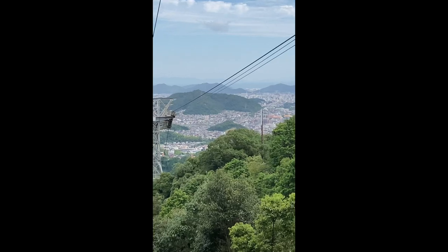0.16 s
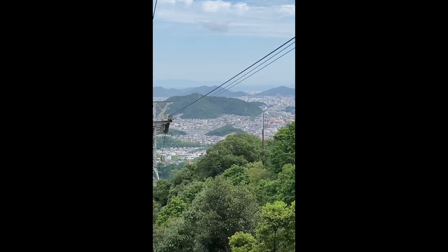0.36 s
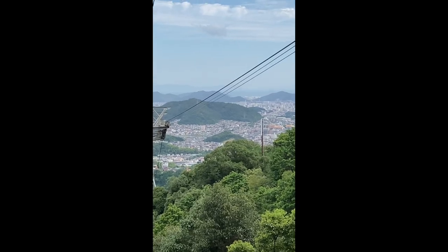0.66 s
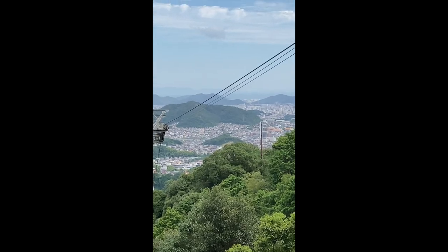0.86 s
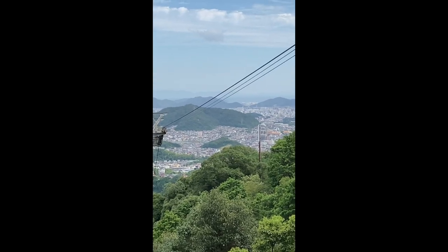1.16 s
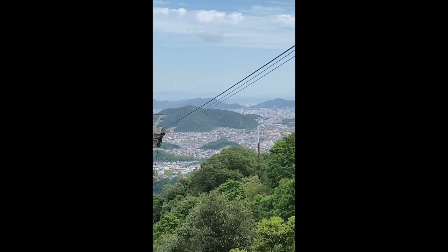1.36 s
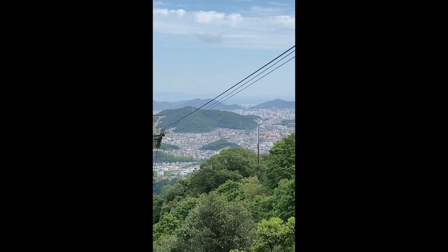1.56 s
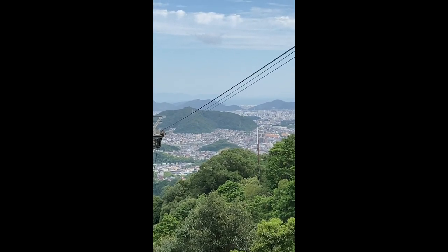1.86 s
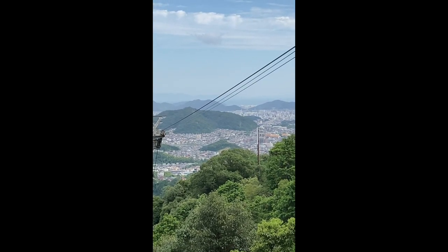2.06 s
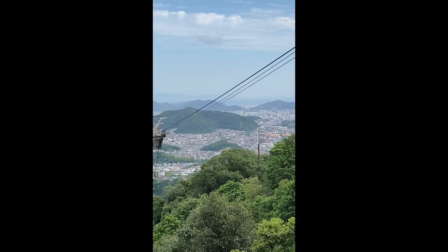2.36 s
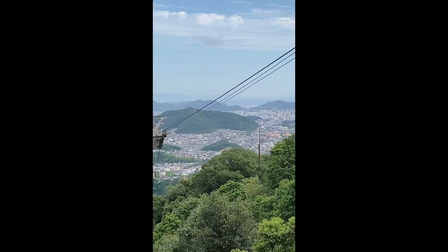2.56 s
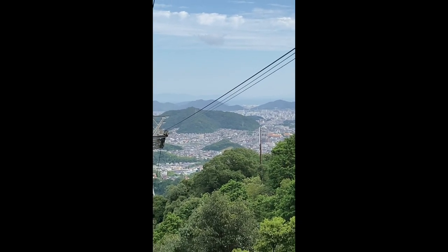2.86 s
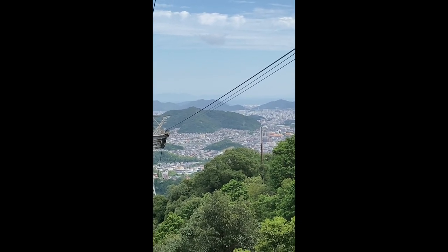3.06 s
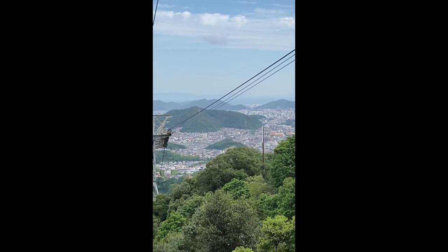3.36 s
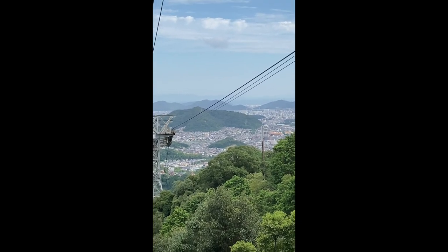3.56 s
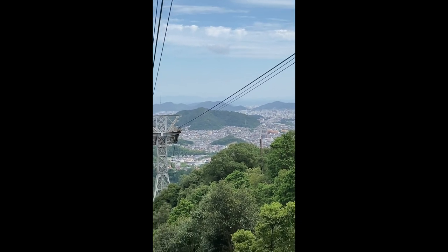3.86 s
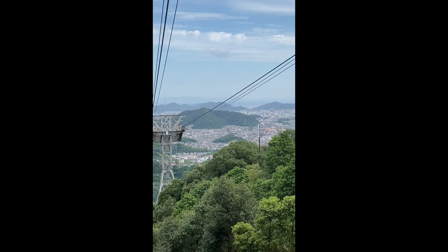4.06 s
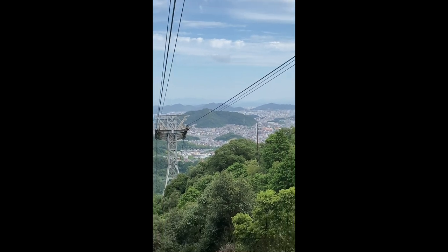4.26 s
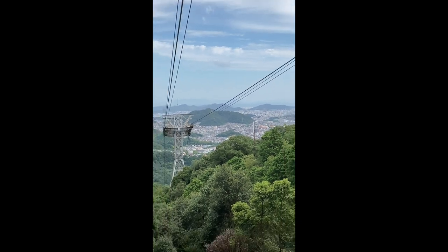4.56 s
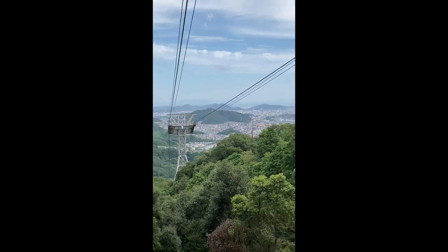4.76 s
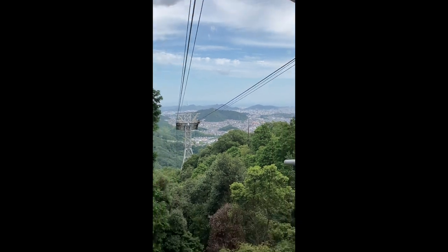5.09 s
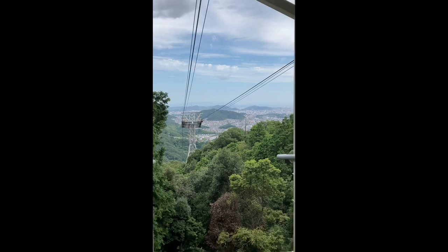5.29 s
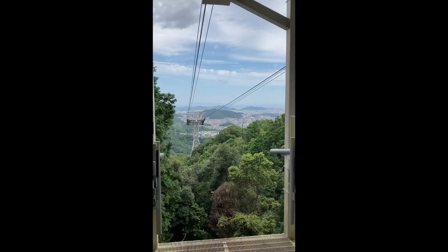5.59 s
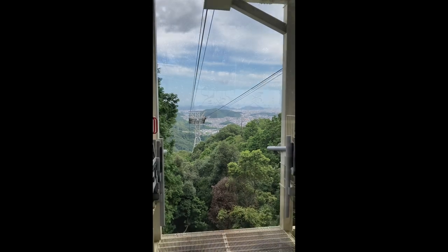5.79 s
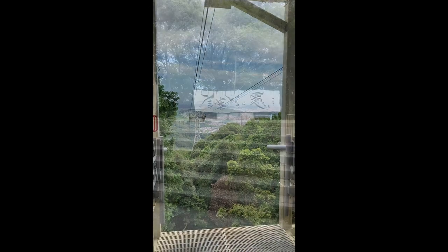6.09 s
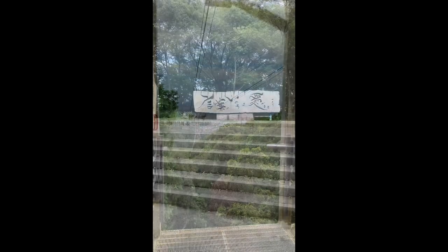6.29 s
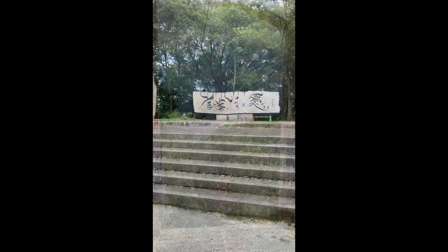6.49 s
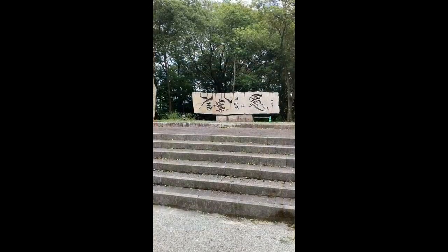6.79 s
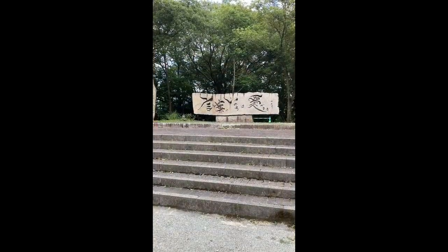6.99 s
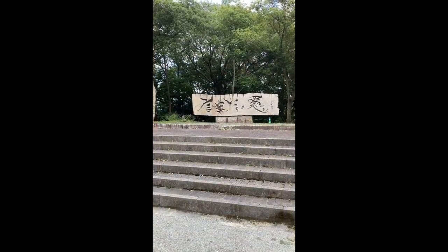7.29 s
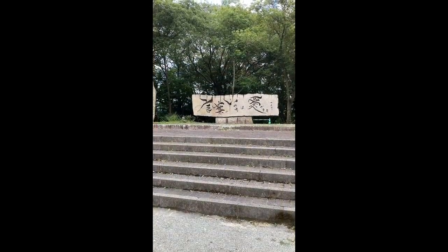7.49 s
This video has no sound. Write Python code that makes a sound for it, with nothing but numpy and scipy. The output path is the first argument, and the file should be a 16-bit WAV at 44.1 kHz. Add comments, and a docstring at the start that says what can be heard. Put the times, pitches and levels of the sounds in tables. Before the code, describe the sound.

On a wooded hillside, a chorus of cicadas hisses and swells over the steady low rumble and gear whine of a cable car station. One nearer cicada starts a buzz that grows louder. Near the end the sound cross-fades to a spot among trees, where the machinery is gone and the cicadas throb and rattle over a faint valley murmur. The insects spread wide in stereo.

```python
"""Cicadas hiss, swell and buzz on a wooded hillside over the rumble and gear whine of a ropeway station.
Distant singers blend into a chorus; nearer ones sing in narrow bands, rattle in bursts or buzz with two tymbals
clicking in turn. Near the end the sound cross-fades to a quieter spot among trees, where the cicadas throb over
a valley murmur and the machinery is gone. Left and right are alike in the bass; in the treble their likeness
and phase difference change from band to band."""
import sys
import numpy as np
from scipy import signal
from scipy.fft import rfft, irfft, next_fast_len
from scipy.io import wavfile
from scipy.ndimage import uniform_filter1d

SR = 44100
rng = np.random.default_rng(int(sys.argv[2]) if len(sys.argv) > 2 else 0)


def put_to_file(sound):
    """Save the sound as 16-bit audio at rate SR, in the file named by the first command-line argument."""
    columns = np.atleast_2d(sound).T  # one column per channel
    safe = np.clip(columns, -1, 1)
    whole_steps = np.round(safe * 32767)
    wavfile.write(sys.argv[1], SR, whole_steps.astype(np.int16))


N = 336909
T = np.arange(N) / SR
N_FFT = next_fast_len(N, True)
BIN_HZ = np.fft.rfftfreq(N_FFT, 1 / SR)
FADE_S = (5.815, 6.74)
TREES = np.interp(T, FADE_S, [0, 1])  # cross-fade gains
STATION = 1 - TREES


def amp(db):
    return 10 ** (np.asarray(db) / 20)


def unit_rms(x):
    return x / np.sqrt(np.mean(x ** 2) + 1e-20)


def over_time(rows):
    times_s, *columns = np.transpose(rows)
    return [np.interp(T, times_s, c) for c in columns]


def over_bins(rows):
    freq_hz, *columns = np.transpose(rows)
    return [np.interp(np.log(BIN_HZ + 1), np.log(freq_hz + 1), c) for c in columns]


def noise():
    """Two unrelated noises: what left and right share and what they do not."""
    return rng.standard_normal((2, N))


def shaped_noise(spectrum):
    """Noise pair with a tabulated spectrum, silent outside it; rms 1."""
    inside = (BIN_HZ > spectrum[0][0]) & (BIN_HZ < spectrum[-1][0])
    gain = amp(over_bins(spectrum)[0]) * inside
    return unit_rms(irfft(rfft(noise(), N_FFT) * gain, N_FFT)[:, :N])


def band(x, centre_hz, width_hz):
    """Steep resonance with a movable centre; rms 1."""
    carrier = np.exp(2j * np.pi * np.cumsum(centre_hz * np.ones(N)) / SR)
    lowpass = signal.butter(3, 0.57 * width_hz, fs=SR, output="sos")
    return unit_rms((carrier * signal.sosfilt(lowpass, x / carrier)).real)


def drift(top_hz):
    """Random wander in the decade below top_hz; rms 1."""
    hz = np.geomspace(top_hz / 10, top_hz, 16)[:, None]
    wander = np.sin(2 * np.pi * (hz * T[::256] + rng.random(hz.shape))).sum(0)
    return np.interp(T, T[::256], unit_rms(wander))


def patchy(x, size, bins, frames, depth_db):
    """Random swells over frequency and time; rms 1."""
    spectra = signal.stft(x, SR, nperseg=size)[2]
    patches = uniform_filter1d(rng.standard_normal(spectra.shape[1:]), bins, 0)
    patches = unit_rms(uniform_filter1d(patches, frames, 1))
    gain = amp(depth_db * np.clip(patches, -3, 1.8))
    return unit_rms(signal.istft(spectra * gain, SR, nperseg=size)[1][:, :N])


def whistle(hz, jitter):
    """A pair of ringing tones, each trembling in pitch and level."""
    cycles = np.array([np.cumsum(hz * (1 + jitter * drift(60.5))) / SR for _ in range(2)])
    return np.sqrt(2) * amp([2.2 * drift(25.5) for _ in range(2)]) * np.sin(2 * np.pi * cycles)


def tones(rows):
    """Wavering sines, each with its own left-right level and phase difference."""
    out = np.zeros((2, N))
    for hz, db, waver_hz, pan_db, lead_rad in rows:
        phase = 2 * np.pi * (hz * T + rng.random()) + 0.48 * drift(waver_hz)
        level = np.sqrt(2) * amp(db + 1.07 * drift(waver_hz))
        out += level * amp([[pan_db / 2], [-pan_db / 2]]) * np.sin([phase + lead_rad, phase])
    return out


def fade_gain(station_db, trees_db):
    """Unrelated sounds at the two spots add in power, so the fade dips."""
    return np.hypot(STATION * amp(station_db), TREES * amp(trees_db))


def stereo_image(pair):
    """Left-right likeness and phase difference, set band by band over frequency."""
    # left against right: freq_hz, likeness, left_lead_rad
    image = [(30, 0.99, .01), (200, .99, .03), (434, 0.88, 0.13), (720, 0.49, 0.13), (1290, 0.7, 0.33),
             (2080, 0.05, 1.8), (3900, 0.14, 3.46), (4350, 0.1, 1.37), (4910, 0.62, 2.83),
             (5480, 0.92, 3.14), (7340, 0.78, 5.01), (7670, 0.99, 6.28), (9760, 1, 6.29), (10140, 0, 7.6),
             (11100, 1.001, 9.42), (12500, 1.001, 9.43), (13220, 0.2, 12.4), (14400, 1.001, 11.9),
             (16500, 1.001, 14)]
    likeness, lead_rad = over_bins(image)
    likeness = np.clip(likeness, 0, 1)
    left, unrelated = rfft(pair, N_FFT)
    right = likeness * np.exp(-1j * lead_rad) * left + np.sqrt(1 - likeness ** 2) * unrelated
    return irfft([left, right], N_FFT)[:, :N]


def valley_murmur():
    """Low noise from far down the valley."""
    # murmur spectrum: freq_hz, relative_db
    spectrum = [(22, -24), (38, -10), (50, -3.5), (78, -11), (125, -7), (190, -11), (250, -17.5),
                (400, -16.5), (700, -23.5), (1050, -20.5), (1500, -22), (2000, -17), (3600, -54)]
    return amp(-52.5 + .7 * drift(4.9)) * shaped_noise(spectrum)


def faint_hums():
    """Three low hums and a thin tone among the trees."""
    # tones: pitch_hz, level_db, waver_hz, left_over_right_db, left_lead_rad
    partials = [(48.4, -54, 3, .3, .02), (74.2, -54, 3, .3, .02), (123, -62, 4, .3, .05),
                (2422, -65, 60, .2, 1.5)]
    return tones(partials)


def pop():
    """One soft falling pop, opposite in left and right."""
    start_s, halving_s, decay_s = 3.6608, .00065, .012
    age_s = np.maximum(T - start_s, 0)
    hz = 20 + 2000 / (1 + age_s / halving_s)
    push = amp(-31.5) * np.exp(-age_s / decay_s) * np.sin(2 * np.pi * np.cumsum(hz * (age_s > 0)) / SR)
    return np.array([push, -push])


def station_rumble():
    """Low, slightly unsteady machinery noise."""
    # rumble spectrum: freq_hz, relative_db
    spectrum = [(22, -32), (38, -18), (57, 2), (70, -5.5), (100, -1), (130, -1), (150, -1.5), (220, -4.5),
                (250, -9), (330, -8), (400, -8.5), (460, -10.5), (600, -13), (1000, -13.5), (1400, -17),
                (2000, -16), (3000, -41.5), (3600, -62)]
    return amp(-46 + 1.21 * drift(9.5)) * shaped_noise(spectrum)


def gear_whine():
    """The ropeway machinery hums and its gears whine."""
    # machine tones: pitch_hz, level_db, waver_hz, left_over_right_db, left_lead_rad
    partials = [(57.5, -52.5, 6, .6, .02), (119.6, -50, 9, .4, .01), (269.2, -63.5, 4, -2.3, .2),
                (386.6, -62, 5, 1.7, .1), (479.4, -58.2, 2.2, .45, -.2), (538.5, -52, 1.3, .9, .7),
                (807.8, -61.5, 1.5, .1, -.3), (1077, -62, 1.5, 11, -2.1), (1346.3, -66, 1.5, 9.4, -.45),
                (1437, -72, 1.5, -4.2, -.35), (1615.6, -73, 1.5, 4.5, -.2), (232, -66, 6, .3, .05),
                (418, -67, 14, .3, .1), (3770, -72, 3, .1, 3.1)]
    return tones(partials)


def far_chorus():
    """Distant cicadas blend to a patchy hiss; thin lines of single singers come and go."""
    # chorus spectrum: freq_hz, relative_db
    spectrum = [(2400, -19.5), (2800, -17), (3550, -29), (4150, -3), (4750, -4.5), (5500, 2.5),
                (6400, -0.9), (7000, -6), (8700, -4.5), (9900, -14.5), (10700, -10), (12500, -10.5),
                (14000, -11), (16500, -12)]
    hiss = patchy(shaped_noise(spectrum), size=512, bins=12, frames=10, depth_db=.5)
    return fade_gain(-34, -34) * patchy(hiss, size=2048, bins=1, frames=5, depth_db=7.5)


def thin_singers():
    """Cicadas heard only as thin overtones, one clear tone and one shrill band."""
    # overtone pitches: time_s, low_hz, middle_hz, high_hz
    pitches = [(4.5, 5770, 8030, 8940), (5.9, 5790, 8110, 9010)]
    # overtone envelope: time_s, level_db
    envelope = [(4.45, -66), (4.7, -67), (5.75, -47), (5.95, -70)]
    # clear tone: time_s, pitch_hz, level_db
    clear_song = [(0, 4360, -56), (.7, 4370, -58), (1.1, 4380, -50), (2.2, 4310, -53), (2.6, 4320, -66),
                  (3.8, 4590, -66), (4.1, 4600, -53), (4.7, 4590, -53), (5.5, 4630, -56), (6.0, 4630, -66)]
    overtones = amp(over_time(envelope)[0]) * sum(whistle(hz, jitter=.001) for hz in over_time(pitches))
    shrill = amp(-48) * np.interp(T, [2.5, 5.5], [1, 0]) * band(noise(), 8238, width_hz=220)
    clear_hz, clear_db = over_time(clear_song)
    return overtones + amp(clear_db) * whistle(clear_hz, jitter=.0029) + shrill


def sizzle():
    """A wide band of unresolved clicking grows and drops back."""
    db = np.interp(T, [.67, 4.06, 4.39], [-47.5, -39.5, -47.5])
    return fade_gain(db, trees_db=-49) * amp(0.46 * drift(10.0)) * band(noise(), 6980, width_hz=880)


def rattling_cicada():
    """High noisy clicks come in bursts, deepest around crest_s."""
    # rattle envelope: time_s, level_db
    envelope = [(0, -58), (2.5, -50), (6.2, -50), (6.7, -46), (6.95, -44), (7.2, -48), (7.64, -47)]
    # body response: freq_hz, relative_db
    body = [(4500, -28), (5500, -14), (7000, -22), (12500, -42), (14300, -3), (15500, -5), (16500, -15)]
    crest_s, burst_hz, click_hz = 7.034, 17.2, 205
    depth_db = 2.5 + 3.8 * np.exp(-((T - crest_s) / .15) ** 2)
    burst_db = depth_db * np.cos(2 * np.pi * (T - crest_s) * burst_hz + .4 * drift(3.5))
    level = amp(over_time(envelope)[0] + burst_db + 0.98 * drift(3.5))
    clicks = 0.38 + np.exp(-(T * click_hz % 1) / .3)
    return level * unit_rms(clicks * shaped_noise(body))


def buzzing_cicada():
    """Two tymbals click in turn, so every second harmonic is stronger; leaves scramble the phases."""
    # buzz: time_s, level_db, body_resonance_hz
    song = [(0, -63, 5100), (2.05, -49, 5250), (2.3, -49, 5100), (2.9, -51, 5150), (3.4, -52, 5390),
            (4.0, -43.5, 5730), (4.4, -45.5, 6040), (4.85, -42, 5700), (5.3, -44, 5900), (6.2, -46, 5950)]
    # tymbal cycle: time_s, rate_hz
    tymbal_rate = [(2.1, 226.2), (4.0, 227.4), (4.6, 227.4), (6.2, 228.6)]
    # two upper resonances, treble, low hiss: centre_hz, width_hz
    side_bands = [(8210, 300), (9120, 300), (13200, 2500), (2720, 450)]
    # those bands against the body: early_db, late_db
    side_levels = [(-4, -4), (-25, -4), (-3, -8), (-30, -22.5)]
    db, body_hz = over_time(song)
    cycles = np.cumsum(over_time(tymbal_rate)[0] * (1 + .0014 * drift(40.5))) / SR
    harmonics, grid = np.arange(18, 66), np.linspace(0, 1, 4097)
    phases = harmonics * grid[:, None] + rng.random((2, 1, len(harmonics)))
    waveforms = np.cos(2 * np.pi * phases) @ (1.7 - harmonics % 2)
    clicks = np.array([np.interp(cycles % 1, grid, wave) for wave in waveforms])
    drives = (clicks, clicks, clicks, noise())
    sides = sum(amp(np.interp(T, (4.7, 4.4), levels_db)) * band(drive, *shape_hz)
                for drive, shape_hz, levels_db in zip(drives, side_bands, side_levels))
    return amp(db + 1.6 * drift(22.5)) * (band(clicks, body_hz, width_hz=570) + sides)


def high_singer():
    """A high hiss that throbs ever more slowly."""
    crest_s, throb_hz, slowing_hz_per_s = 7.02, 9.05, 2.25
    offset_s = T - crest_s
    cycles = throb_hz * offset_s - slowing_hz_per_s * offset_s ** 2 / 2
    return amp(-6.5 + 10 * np.cos(2 * np.pi * cycles)) * band(noise(), 8498, width_hz=350)


def swelling_cicadas():
    """A group sings in three bands about an octave apart; the nearest singer throbs."""
    # main band: time_s, level_db, pitch_hz
    main_song = [(0, -50, 4300), (.3, -46, 4500), (.7, -44.5, 4400), (1.5, -47, 4450), (2.2, -49, 4380),
                 (2.7, -48, 4360), (4.2, -62, 4470), (4.8, -47, 4415), (5.7, -45, 4370), (7.0, -41.5, 4330),
                 (7.64, -47, 4300)]
    # one clearer singer: time_s, pitch_hz, relative_db
    clear_song = [(0, 4210, -5), (.33, 4170, 0.5), (.45, 4380, -16), (.7, 4564, -7), (1.2, 4540, 4),
                  (2.0, 4520, -15), (4.2, 4250, -9), (4.7, 4270, -1), (4.9, 4325, 4.5), (5.3, 4315, 4),
                  (5.6, 4330, 6), (5.82, 4320, 4), (6.05, 4270, -1), (6.3, 4197, 1), (6.8, 4180, -4),
                  (7.1, 4158, -3.5), (7.64, 4152, -2.5)]
    # half-pitch band: time_s, level_db, pitch_hz
    lower_song = [(0, -54, 2170), (.55, -47.5, 2194), (2.2, -49, 2183), (3.1, -49.5, 2180),
                  (3.8, -52.5, 2180), (4.6, -50.5, 2207), (5.5, -47, 2200), (6.3, -47, 2180),
                  (7.0, -47, 2180), (7.64, -50.5, 2150)]
    main_db, main_hz = over_time(main_song)
    clear_hz, clear_db = over_time(clear_song)
    lower_db, lower_hz = over_time(lower_song)
    upper_db = np.interp(T, [2.2, 2.7, 4.2, 4.36], [-42, -48, -50, -42])

    crest_s, throb_hz = 7.015, 10.0
    beat = 2 * np.pi * (T - crest_s) * throb_hz
    pulses = np.cos(beat) + 0.47 * np.cos(2 * beat)  # strong and weak in turn
    throb_db = np.interp(T, FADE_S, [1, 1.5]) * pulses

    main = amp(0.41 * throb_db) * band(noise(), main_hz, width_hz=340)
    main += amp(clear_db + 1.4 * throb_db) * whistle(clear_hz, jitter=np.interp(T, FADE_S, [.0055, .003]))
    upper = patchy(band(noise(), 8436, width_hz=1030), size=2048, bins=2, frames=14, depth_db=3.0)
    upper += STATION * amp(clear_db - 8.5) * band(noise(), clear_hz * 2, width_hz=170)
    upper += TREES * high_singer()
    lower = patchy(band(noise(), lower_hz, width_hz=194), size=4096, bins=2, frames=6, depth_db=4.5)
    lower += amp(clear_db - 8) * whistle(clear_hz / 2, jitter=.012)

    main *= amp(main_db + 0.25 * drift(20.5))
    lower *= amp(lower_db + 0.53 * throb_db + 0.76 * drift(12.5))
    return fade_gain(0, 0) * (main + amp(upper_db) * upper + lower)


def scene():
    """The station cross-fades to the trees; most of the cicadas carry on at both spots."""
    background = STATION * station_rumble() + TREES * valley_murmur()
    cicadas = far_chorus() + swelling_cicadas() + sizzle()
    cicadas += STATION * (buzzing_cicada() + thin_singers()) + rattling_cicada()
    return stereo_image(background + cicadas) + STATION * gear_whine() + TREES * faint_hums() + pop()


def record(dry):
    """Steep treble cut-off."""
    cutoff_hz = 15720
    lowpass = signal.firwin(1023, cutoff_hz, window=("kaiser", 10), fs=SR)
    return signal.oaconvolve(dry, lowpass[None], "same")


dry = scene()
out = record(dry)
put_to_file(out)
```